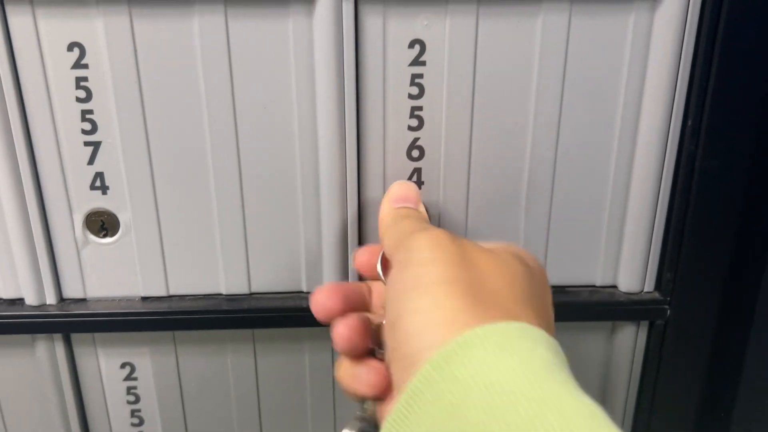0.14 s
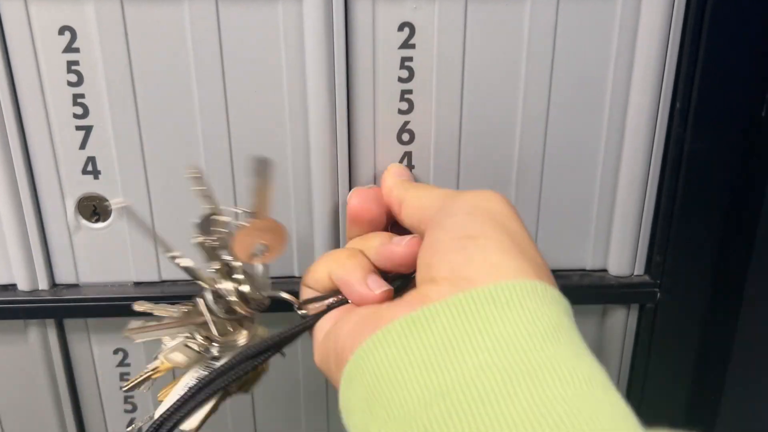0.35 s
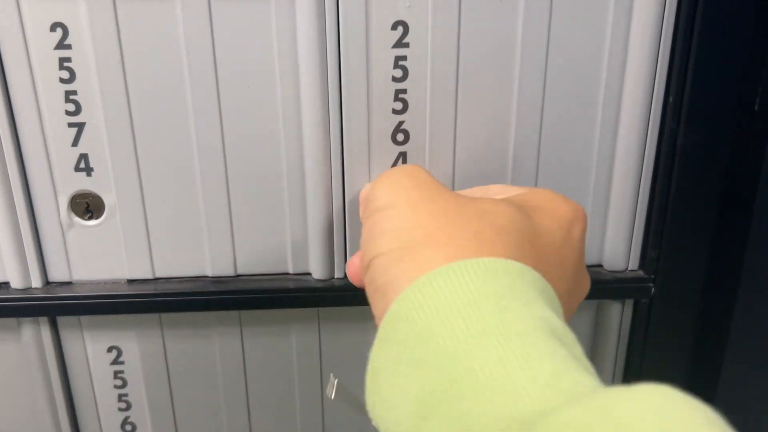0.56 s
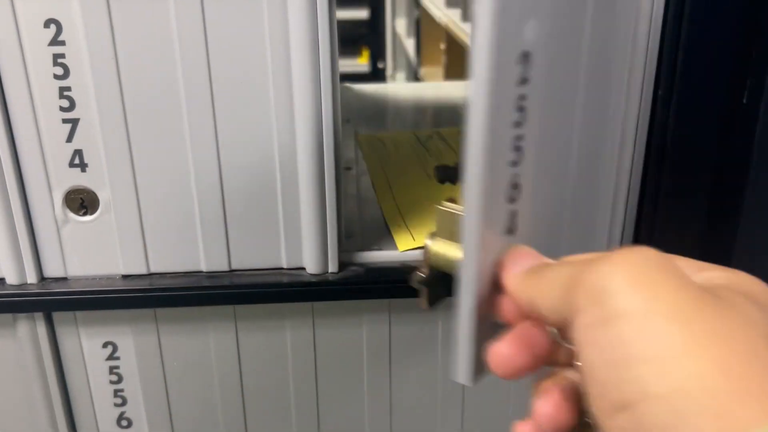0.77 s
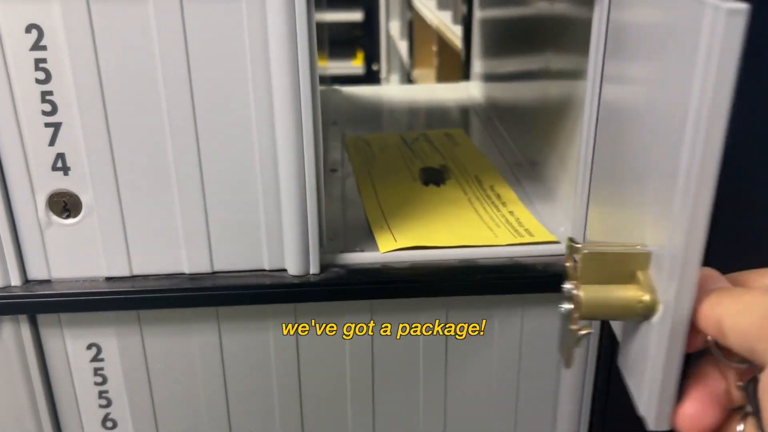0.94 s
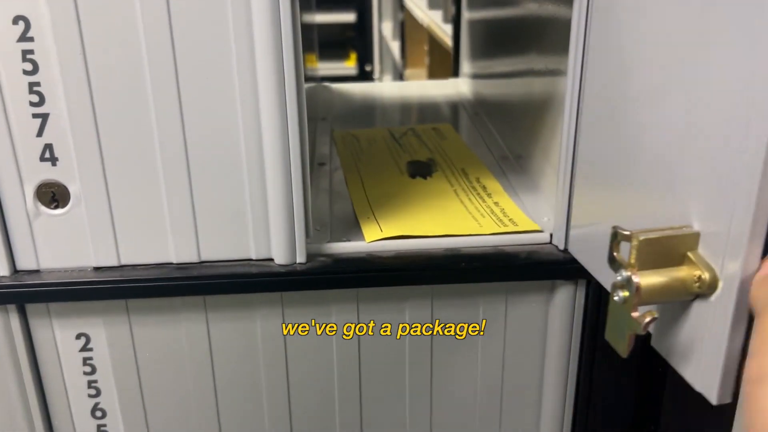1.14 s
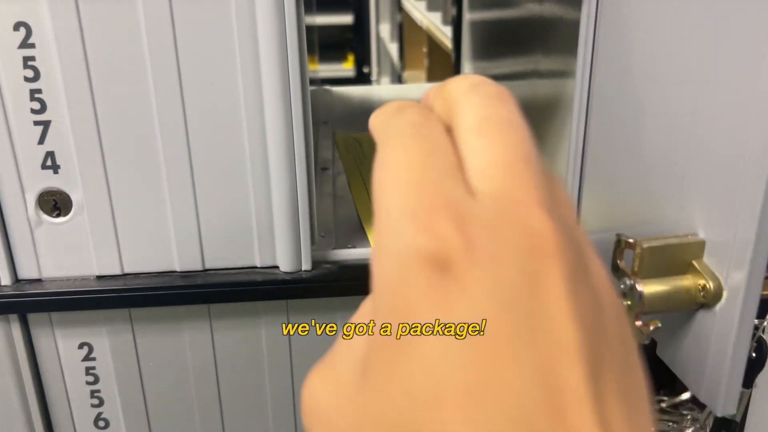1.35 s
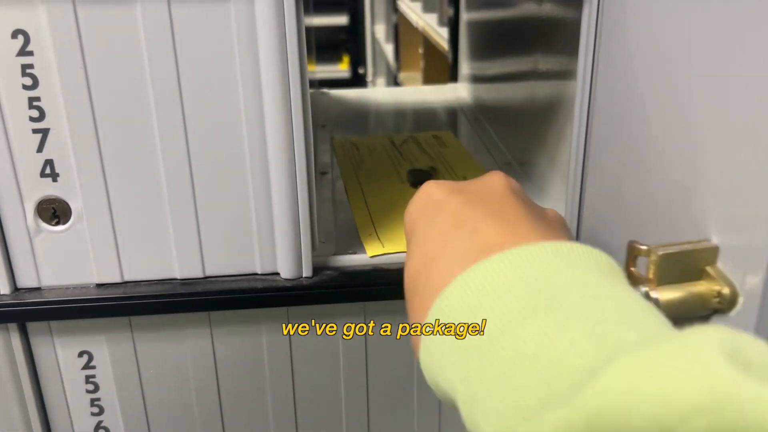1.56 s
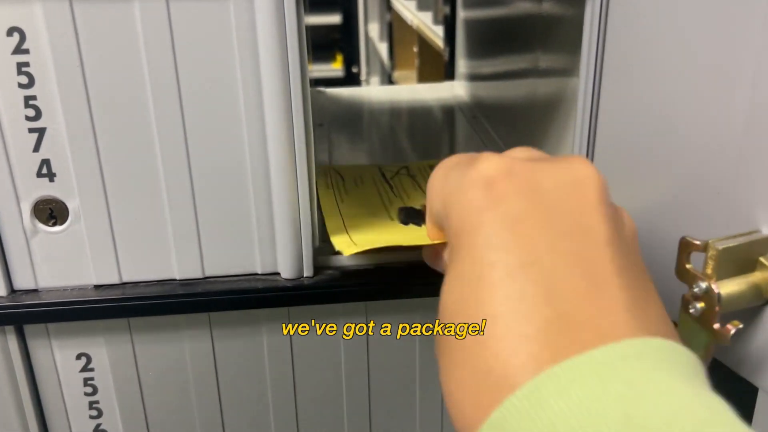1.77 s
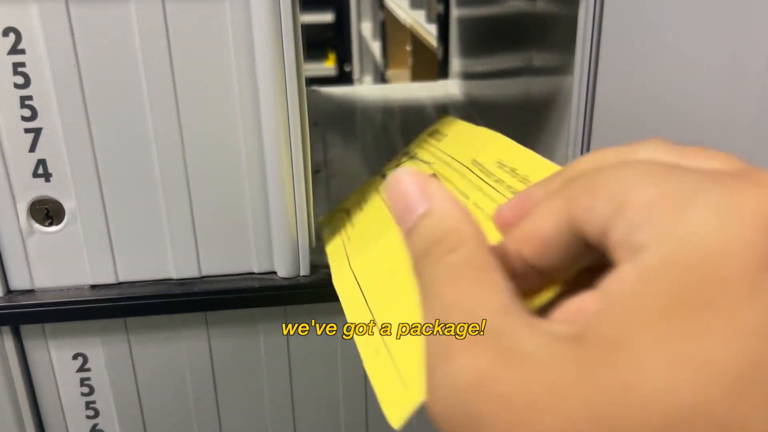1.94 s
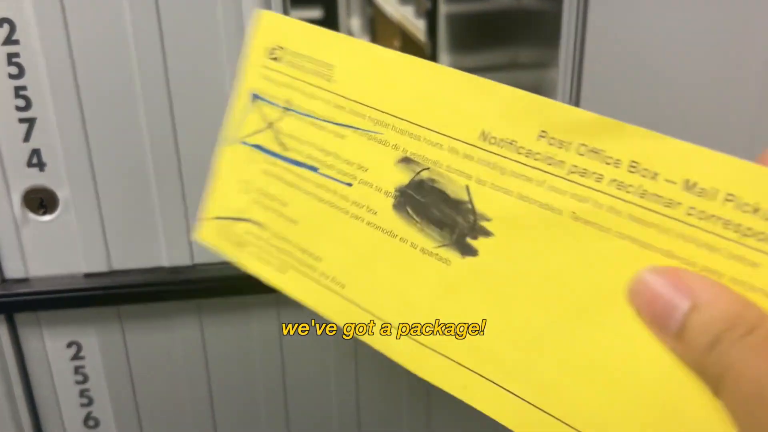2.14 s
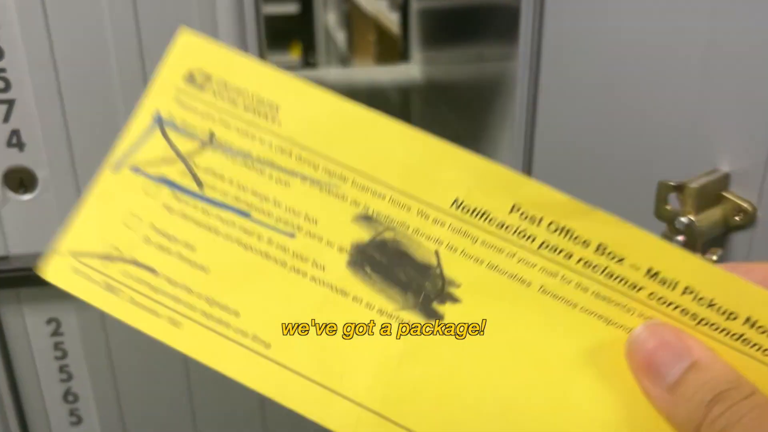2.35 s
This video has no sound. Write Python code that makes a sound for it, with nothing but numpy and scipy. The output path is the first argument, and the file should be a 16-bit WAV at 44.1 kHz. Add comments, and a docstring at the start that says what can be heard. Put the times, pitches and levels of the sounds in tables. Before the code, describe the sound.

A metal mailbox is unlocked close to the microphone: dull knocks and sharp clacks of key and bolt from 0 to 0.56 seconds, bright keys jangling mostly from 0.35 to 1.1. The door jerks free with a clank around 0.8, with faint rattles until 1.4. From 1.6 to 2.3 fingers tap the hollow compartment and a paper card rubs and snaps. Low steady ventilation hum, short lobby reverberation.

```python
"""Key and card at a metal mailbox

In a lobby, an arm's length from the microphone, a key turns in a small mailbox lock and its bunch jangles below.
The bolt snaps back, the door is pulled open, and a hand slides a paper card out of the compartment.
Metal blows are decaying modes mixed with noise bursts; keys add ringing sines; the card is filtered random clicks.
The right port lags the left, the lobby answers with a noise-tail reverberation, and ventilation hums low."""
import sys
import numpy as np
from scipy import signal
from scipy.fft import rfft, irfft, next_fast_len
from scipy.io import wavfile
from scipy.ndimage import map_coordinates

SR = 44100
rng = np.random.default_rng(int(sys.argv[2]) if len(sys.argv) > 2 else 0)


def to_wav(s):
    """Save 16-bit WAV."""
    ch = np.atleast_2d(s).T  # columns
    pcm = np.round(np.clip(ch, -1, 1) * 32767)  # PCM
    wavfile.write(sys.argv[1], SR, pcm.astype(np.int16))


N = 110205
TIME = np.arange(N) / SR
HIT_TIME = TIME[:SR // 2]

# Decays: fast t60/s, after-ring level/dB, after-ring t60/s
LOCK_DECAY, DOOR_DECAY, TICK_DECAY = (0.059, -8, 0.28), (0.045, -21, 0.35), (0.039, -24, 0.065)
FLAP_DECAY, SNAP_DECAY, CLINK_DECAY = (0.053, -5, 0.11), (0.01, -8, 0.06), (0.022, -13, 0.044)
CONTACT_SPREAD_DB = 0.5  # unevenness of metal contacts

# Key, cylinder and bolt knock in the lock, close by: t/s, door thud level/dB, clack level/dB, tick level/dB
LOCK_KNOCKS = [(.024, -33.5, -40, -81), (0.088, -38.5, -55.5, -71), (.250, -29, -32, -53.5),
               (0.2606, -38, -31, -38), (.354, -62, -40.5, -49), (0.3683, -32.5, -33, -55),
               (.521, -52, -42, -20), (.529, -40, -28.5, -28), (0.561, -30.5, -38, -53)]
# Panel of the shut door: t60/s, then modes as f/Hz, level/dB
SHUT_DOOR_MODES = (0.052, [(205, -2), (300, -3), (372, 0), (472, -3)])
# Small parts of the lock: t60/s, then modes as f/Hz, level/dB
LOCK_MODES = (0.02, [(1250, -7.5), (1595, -13), (2090, 3.5), (3560, -0.5), (4740, 5.5)])
# Spectrum of the unpitched lock clack: f/Hz, relative level/dB
LOCK_CLACK = [(200, -37.5), (500, 6), (950, -0.5), (1900, -2), (2700, -8), (4700, -8.5), (15000, -31)]


def lock():
    """Knocks of the lock parts ring the lock itself and the shut door's panel."""
    tone_db = -0.5  # modes against the unpitched part
    return metal_knocks(LOCK_KNOCKS, SHUT_DOOR_MODES, LOCK_MODES, LOCK_CLACK, LOCK_DECAY, tone_db)


PANEL_RING_HZ, PANEL_RING_DB, PANEL_RING_T60_S = 215.4, -7.5, 0.11  # level against each thud


def panel_ring():
    """Every knock in the lock sets the latched door's lowest mode humming as a decaying sine."""
    out = np.zeros(N)
    for s, thud_db, _, _ in LOCK_KNOCKS:
        level = amp(thud_db + PANEL_RING_DB - 60 * HIT_TIME / PANEL_RING_T60_S)
        add(out, s, level * np.sin(2 * np.pi * PANEL_RING_HZ * HIT_TIME))
    return out


# Cylinder and bolt reach their stops, the door shudders, a finger lands on the shelf: t/s, f/Hz, peak level/dB
CLUNKS = [(.369, 686, -27), (.529, 1953, -28), (.842, 260, -26), (1.632, 251, -24)]
CLUNK_T60_S = 0.055


def clunks():
    """Blows that set mainly one mode ringing, each a decaying sine."""
    out = np.zeros(N)
    for s, hz, db in CLUNKS:
        add(out, s, amp(db - 60 * HIT_TIME / CLUNK_T60_S) * np.sin(2 * np.pi * hz * HIT_TIME))
    return out


# The door jerks free and knocks as it swings: t/s, thud level/dB, clack level/dB, tick level/dB
DOOR_KNOCKS = [(.8148, -36, -26, -33.5), (1.162, -56, -55.5, -42.5), (1.275, -44, -42, -37),
               (1.296, -41.5, -72, -44), (1.434, -69, -42.5, -42)]
# Low body of the open door: t60/s, then modes as f/Hz, level/dB
OPEN_DOOR_MODES = (0.26, [(184, 0.5), (255, 0.5), (382, 3)])
# Ringing of the door's clack: t60/s, then modes as f/Hz, level/dB
DOOR_MODES = (0.034, [(1034, 1), (1281, 10), (1509, 2.5), (4555, 4), (4790, 14)])
# Spectrum of the unpitched door clack: f/Hz, relative level/dB
DOOR_CLACK = [(300, 2), (1300, -4), (2800, 5), (4500, 11.5), (7000, -7)]


def door():
    """Knocks of the swinging door ring its low panel modes and higher metal modes."""
    tone_db = -1.5  # modes against the unpitched part
    return metal_knocks(DOOR_KNOCKS, OPEN_DOOR_MODES, DOOR_MODES, DOOR_CLACK, DOOR_DECAY, tone_db)


# Spectrum of the bright tick of metal on metal: f/Hz, relative level/dB
METAL_TICK = [(1500, 4.5), (7000, 9), (10500, 19.5), (14000, -3.5)]
GRIND_GRAINS_PER_S = 1950
SCRAPE_S, SCRAPE_DB = 0.012, -7  # width of the grind at 1/e; level against the clack


def metal_knocks(knocks, low_modes, modes, colour, decay, tone_db):
    """Each knock is a panel thud, a ringing clack and a bright tick, with a brief grind swelling around it."""
    out = np.zeros(N)
    grind = rms_one(coloured(grains(GRIND_GRAINS_PER_S, CONTACT_SPREAD_DB), colour))
    for s, thud_db, clack_db, tick_db in knocks:
        thud = ringing(low_modes)
        clack = attack_one(crack(colour, decay) + amp(tone_db) * ringing(modes))
        tick = crack(METAL_TICK, TICK_DECAY)
        add(out, s, amp(thud_db) * thud + amp(clack_db) * clack + amp(tick_db) * tick)
        swell = np.exp(-((TIME - s) / SCRAPE_S * 2) ** 2)
        out += grind * amp(clack_db + SCRAPE_DB) * swell
    return out


# Short partials of the whole bunch: f/Hz
KEY_PARTIALS_HZ = [7833, 8101, 8467, 10350, 10748, 11063, 11560, 12046, 13662, 14193]
KEY_MODES = (0.033, [(hz, 0) for hz in KEY_PARTIALS_HZ])  # t60/s, then f/Hz, level/dB
# Spectrum of the unpitched key rattle: f/Hz, relative level/dB
KEY_RATTLE = [(500, -34), (7000, -11), (10700, -2), (13000, -16.5), (16000, -14.5)]
KEY_TONE_DB = -9.5  # modes against the unpitched part


def clink():
    """Two keys touch: an unpitched rattle with the bunch's short partials."""
    return attack_one(crack(KEY_RATTLE, CLINK_DECAY) + amp(KEY_TONE_DB) * ringing(KEY_MODES, spread_db=5))


# How hard the bunch jostles below the lock: t/s, level/dB
JOSTLE = [(.33, -49), (.40, -65), (.44, -45.5), (.51, -42), (.595, -33), (.635, -38.5), (.675, -32.5),
          (.80, -55.5), (.93, -41), (1.05, -57), (1.22, -58), (1.275, -38), (1.39, -58.5), (1.6, -59.5)]
# Keys clink against each other: t/s, level/dB
KEY_CLINKS = [(0.179, -54), (0.3756, -32.5), (0.436, -34), (0.659, -35), (.670, -41), (.769, -35.5),
              (0.914, -35.5), (0.932, -38.5), (0.984, -36.5), (1.117, -38), (1.514, -51)]
# Pitches of the keys that ring longest
KEY_A_HZ, KEY_B_HZ, KEY_C_HZ, KEY_D_HZ = 8647, 9492, 11837, 12524
# A key swings free and rings until a neighbour stops it: t/s, f/Hz, level/dB, free for t/s
KEY_RINGS = [(0.406, KEY_A_HZ, -32, 0.075), (0.408, KEY_D_HZ, -41, .07), (0.485, KEY_C_HZ, -38, .035),
             (0.538, KEY_C_HZ, -31, 0.026), (0.689, KEY_B_HZ, -26, 0.034), (.830, KEY_A_HZ, -37.5, 0.0038),
             (.890, KEY_A_HZ, -34, 0.0073), (0.953, KEY_A_HZ, -33, 0.029), (1.006, KEY_A_HZ, -32.5, 0.0025),
             (1.020, KEY_A_HZ, -30, 0.0051)]
CONTACTS_PER_S = 330
KEY_FREE_T60_S, KEY_NEIGHBOUR_T60_S = 0.37, 0.051  # the neighbour's damping adds to the free decay
KEY_STRIKE_DB = -8  # the clink that starts a ring, against the ring
KEY_FLUTTER_DB, KEY_FLUTTERS_PER_S = 2, 170  # level wavers as the key swings


def keys():
    """Small random contacts, single clinks, and struck keys that ring on unevenly for a moment."""
    count = 12  # different clinks shared by the contacts
    jostle = np.zeros(N)
    for _ in range(count):
        contacts = grains(CONTACTS_PER_S / count, CONTACT_SPREAD_DB)
        jostle += signal.fftconvolve(contacts, clink())[:N]
    # Silent before the first and after the last table row.
    jostle_db = np.interp(TIME, *np.transpose(JOSTLE), left=-np.inf, right=-np.inf)
    out = rms_one(jostle) * amp(jostle_db)
    for s, db in KEY_CLINKS:
        add(out, s, amp(db) * clink())
    for s, hz, db, free_s in KEY_RINGS:
        stopped = np.maximum(HIT_TIME - free_s, 0)
        fall = HIT_TIME / KEY_FREE_T60_S + stopped / KEY_NEIGHBOUR_T60_S
        flutter = KEY_FLUTTER_DB * drift(KEY_FLUTTERS_PER_S)[:len(HIT_TIME)]
        ring = amp(db + flutter - 60 * fall) * np.sqrt(2) * np.sin(2 * np.pi * hz * HIT_TIME)
        add(out, s, ring + amp(db + KEY_STRIKE_DB) * clink())
    return out


# How hard the card rubs on the shelf and fingers: t/s, level/dB
RUB = [(1.61, -58.5), (1.71, -41), (1.82, -49), (1.95, -48), (1.98, -58), (2.048, -54.5), (2.075, -35.5),
       (2.11, -61), (2.19, -66), (2.245, -41), (2.268, -56), (2.35, -53), (2.385, -78)]
# Spectrum of the rub: f/Hz, relative level/dB
CARD_RUB = [(400, 2.5), (800, -8.5), (2300, -3.5), (3100, -1.5), (5500, 0), (10000, 2.5), (12500, -12)]
# Fingers and card tap the compartment: t/s, thud level/dB, flap level/dB, crisp snap level/dB
CARD_TAPS = [(1.6237, -35.5, -50, -32.5), (1.651, -45, -55, -39), (1.843, -37, -39.5, -35.5),
             (1.941, -45.5, -50, -44), (2.0758, -32, -33, -28.5), (2.094, -57, -32, -64),
             (2.147, -40.5, -40, -44.5), (2.2495, -45.5, -50.5, -43.5)]
# Hollow of the compartment: t60/s, then modes as f/Hz, level/dB
BOX_MODES = (0.072, [(243, -4.4), (392, 4.4)])
# Spectrum of the card's flap: f/Hz, relative level/dB
CARD_FLAP = [(250, -2.5), (1400, -9.5), (5000, -26), (15000, -36)]
# Spectrum of the card's crisp snap: f/Hz, relative level/dB
CARD_SNAP = [(1000, -5.5), (6000, 0.5), (10000, -3.5), (14000, -34)]
# The card sticks and chirps: t/s, f/Hz, level/dB
CARD_CHIRPS = [(1.952, 2220, -39.5)]
FIBRES_PER_S, FIBRE_SPREAD_DB = 3900, 0.5
RUB_CATCH_DB, RUB_CATCHES_PER_S = 4, 130  # the card catches and slips
CHIRP_S, CHIRP_WIDTH_HZ, CHIRP_WAVERS_PER_S = 0.014, 120, 940


def card():
    """The card rubs over the shelf, chirps where it sticks, and taps the hollow box."""
    rub = rms_one(coloured(grains(FIBRES_PER_S, FIBRE_SPREAD_DB), CARD_RUB))
    rub_db = np.interp(TIME, *np.transpose(RUB), left=-np.inf)
    out = rub * amp(rub_db + RUB_CATCH_DB * drift(RUB_CATCHES_PER_S))
    for s, thud_db, flap_db, snap_db in CARD_TAPS:
        thud = amp(thud_db) * ringing(BOX_MODES)
        flap = amp(flap_db) * crack(CARD_FLAP, FLAP_DECAY)
        snap = amp(snap_db) * crack(CARD_SNAP, SNAP_DECAY)
        add(out, s, thud + flap + snap)
    swell = np.sin(np.pi * np.minimum(TIME / CHIRP_S, 1))
    for s, hz, db in CARD_CHIRPS:
        pitch = hz + CHIRP_WIDTH_HZ * drift(CHIRP_WAVERS_PER_S)
        chirp = np.sqrt(2) * np.sin(2 * np.pi * np.cumsum(pitch) / SR)
        add(out, s, amp(db) * swell * chirp)
    return out


# The microphone's left port hears first: f/Hz, lead/rad
PORT_PHASE = [(1500, 0.5), (2600, 2), (4600, 2.04), (7400, 6), (10100, 9.5), (12200, 12.5), (16000, 16)]


def placed(x):
    """The right port hears the sound a moment after the left, as a phase lag at each frequency."""
    size = next_fast_len(N + SR // 10)
    phase = at_hz(PORT_PHASE, np.fft.rfftfreq(size, 1 / SR))
    right = irfft(rfft(x, size) * np.exp(-1j * phase), size)[:N]
    return np.array([x, right])


# Spectrum of the lobby's reverberation before its decay: f/Hz, relative level/dB
ROOM_COLOUR = [(300, 3), (800, -0.5), (14000, -6.5)]
ROOM_T60_S, ROOM_TREBLE_T60_S, ROOM_SPLIT_HZ, ROOM_DB = 0.51, 0.25, 1720, -12.5


def room(x):
    """The lobby's diffuse reverberation is a decaying noise tail; the treble dies first."""
    noise, t = diffuse(ROOM_COLOUR)[:, :SR], TIME[:SR]
    low = signal.sosfilt(signal.butter(2, ROOM_SPLIT_HZ, "low", fs=SR, output="sos"), noise)
    high = signal.sosfilt(signal.butter(2, ROOM_SPLIT_HZ, "high", fs=SR, output="sos"), noise)
    # Subtracting keeps the two bands from cancelling at the split.
    tail = low * amp(-60 * t / ROOM_T60_S) - high * amp(-60 * t / ROOM_TREBLE_T60_S)
    tail *= np.minimum(t / 0.0023, 1)  # onset in s
    tail /= np.sqrt(np.sum(tail ** 2) / 2)
    return amp(ROOM_DB) * signal.fftconvolve(x[None], tail, axes=1)[:, :N]


# Spectrum of the soft air rumble in the lobby: f/Hz, relative level/dB
LOBBY = [(20, -21.5), (60, 9), (115, 1.5), (230, -5), (800, -22.5), (8700, -42.5), (11000, -61)]
HUM_HZ, HUM_DB, HUM_WAVER_DB, HUM_WANDER_RAD, LOBBY_DB = 58.64, -34.5, 1.05, 0.048, -44


def ventilation():
    """A low sine hum, wavering in level and phase, over a soft noise rumble of air."""
    level = amp(HUM_DB + HUM_WAVER_DB * drift(18.0))
    phase = 2 * np.pi * HUM_HZ * TIME + HUM_WANDER_RAD * drift(15.0)
    hum = level * np.sqrt(2) * np.sin(phase)
    return hum + amp(LOBBY_DB) * diffuse(LOBBY)


# Likeness of the two ports in diffuse sound: f/Hz, correlation (1 = identical)
LIKENESS = [(60, 1), (300, 0.96), (1500, 0.058)]


def diffuse(colour):
    """Stereo noise arriving from all sides: the ports agree in the bass and differ in the treble."""
    hz = np.fft.rfftfreq(2 * N, 1 / SR)
    alike = np.clip(at_hz(LIKENESS, hz), -1, 1)
    noise = rfft(rng.standard_normal((2, 2 * N))) * amp(at_hz(colour, hz))
    mid, side = noise * np.sqrt([1 + alike, 1 - alike])
    return rms_one(irfft(np.array([mid + side, mid - side]))[:, :N])


def ringing(body, spread_db=3):
    """One blow on a set of modes, each a decaying sine with a random strength of its own."""
    t60, modes = body
    out = np.zeros(len(HIT_TIME))
    for k, (hz, db) in enumerate(modes):
        level = amp(db + rng.normal(0, spread_db) - 60 * HIT_TIME / t60)
        out += (-1) ** k * level * np.sin(2 * np.pi * hz * HIT_TIME)
    return attack_one(out)


CONTACT_DB = -11.5  # contact click against the first 10 ms of the envelope


def crack(colour, decay):
    """Countless close modes as noise: a fast crack and a weaker after-ring, with a contact click 1 ms in."""
    t60, after_db, after_t60 = decay
    envelope = amp(-60 * HIT_TIME / t60) + amp(after_db - 60 * HIT_TIME / after_t60)
    burst = rng.standard_normal(len(HIT_TIME)) * envelope
    burst[SR // 1000] += amp(CONTACT_DB) * np.linalg.norm(envelope[:SR // 100])
    return attack_one(coloured(burst, colour))


def grains(per_s, spread_db):
    """Random clicks of uneven size and either polarity."""
    happens = rng.random(N) < per_s / SR
    size = amp(spread_db * np.minimum(rng.exponential(1, N), 4))
    return happens * size * rng.choice([-1, 1], N)


def drift(rate):
    """Smooth random wandering of rms 1, through `rate` random knots per second."""
    knots = rng.standard_normal(400)
    return rms_one(map_coordinates(knots, [TIME * rate + 2], mode="wrap"))


def coloured(x, points):
    """Causal (minimum-phase) filter with the given spectrum, built by folding its cepstrum."""
    size = 4096
    cepstrum = irfft(np.log(amp(at_hz(points, np.fft.rfftfreq(size, 1 / SR)))))
    cepstrum[1:size // 2] *= 2
    cepstrum[size // 2 + 1:] = 0
    return signal.fftconvolve(x, irfft(np.exp(rfft(cepstrum))))[:len(x)]


def at_hz(points, hz):
    """Read a table on a log-frequency axis."""
    f, value = np.transpose(points)
    return np.interp(np.log(hz + 1), np.log(f), value)


def add(out, s, sound):
    """Mix a sound in at time s."""
    start = max(int(s * SR), 0)
    out[start:start + len(sound)] += sound[:N - start]


def attack_one(x):
    """Scale a blow so that its first 9 ms have rms 1."""
    return x / np.sqrt(np.mean(x[:int(0.009 * SR)] ** 2) + 1e-20)


def rms_one(x):
    """Scale to rms 1."""
    return x / np.sqrt(np.mean(x ** 2) + 1e-20)


def amp(db):
    """Decibels to gain."""
    return 10 ** (np.asarray(db) / 20)


def scene():
    """Lock, door, keys and card close to the microphone in the humming lobby."""
    box = lock() + panel_ring() + clunks() + door()
    near = box + keys() + card()
    return placed(near) + room(near) + ventilation()


CUTOFF_HZ = 16000


def record(dry):
    """A steep low-pass cuts the top, 70 dB down from just above the cutoff."""
    low_pass = signal.cheby2(12, 70, CUTOFF_HZ * 1.06, fs=SR, output="sos")
    return signal.sosfilt(low_pass, dry)


dry = scene()
out = record(dry)
to_wav(out)
```